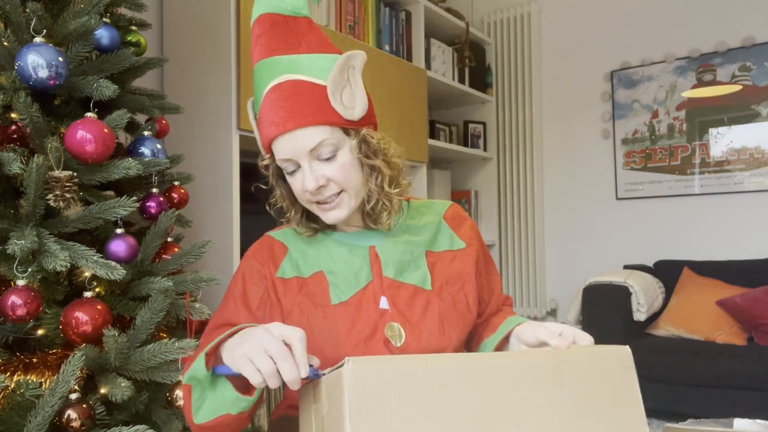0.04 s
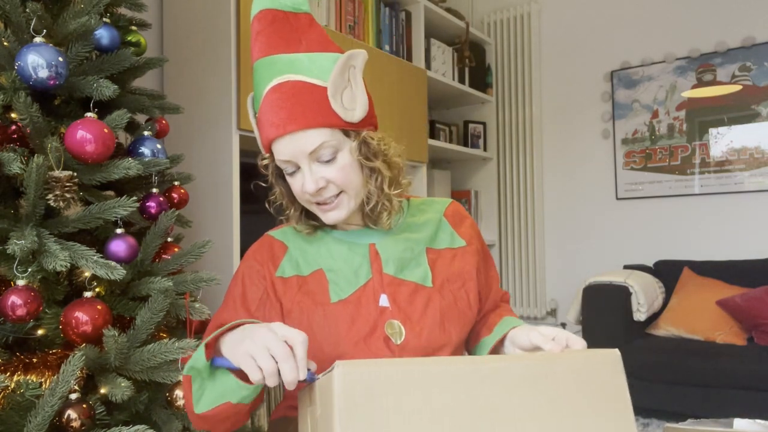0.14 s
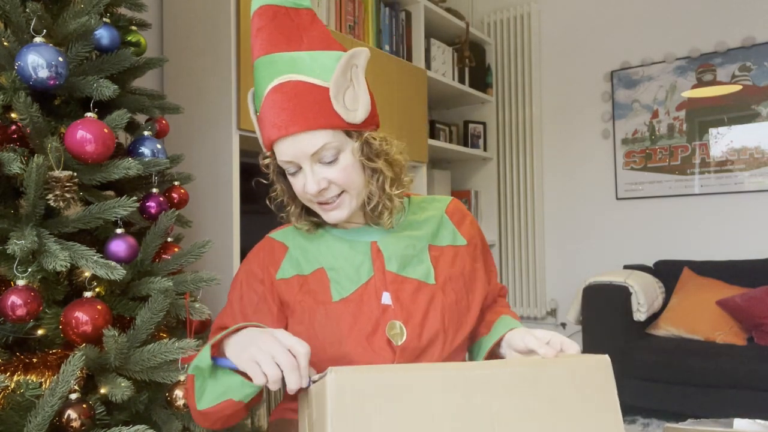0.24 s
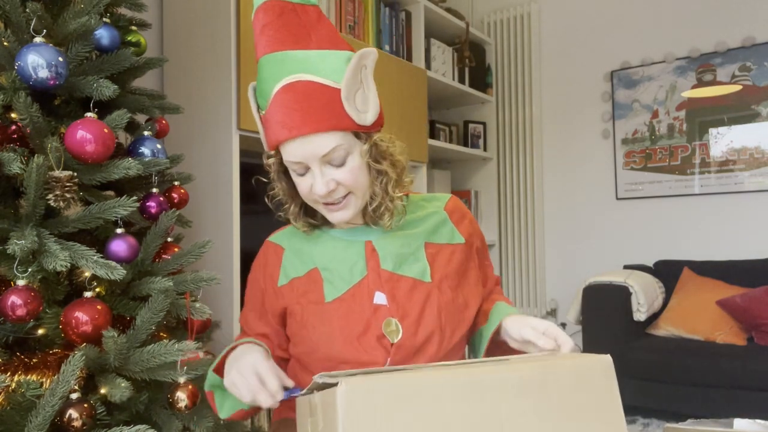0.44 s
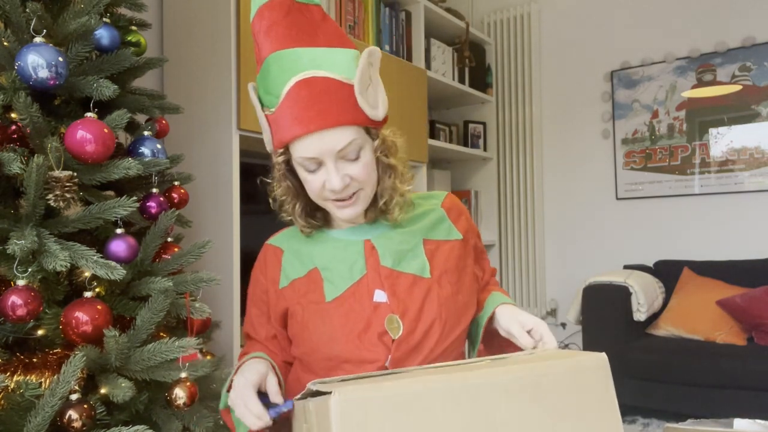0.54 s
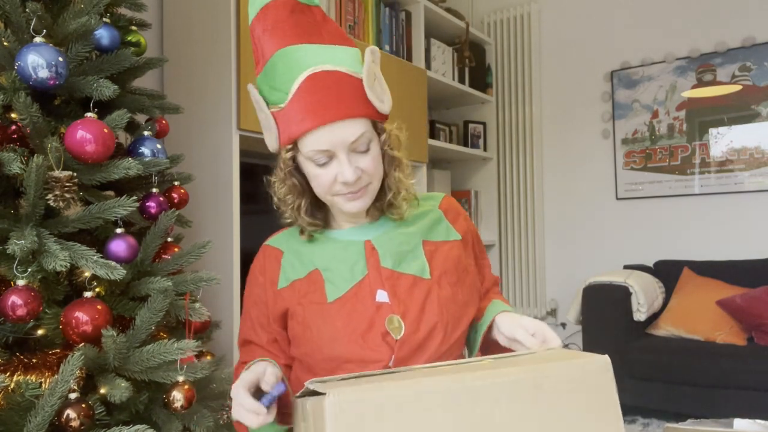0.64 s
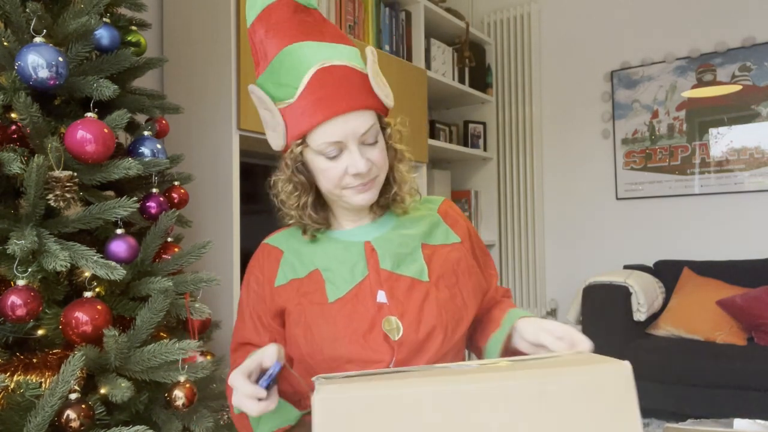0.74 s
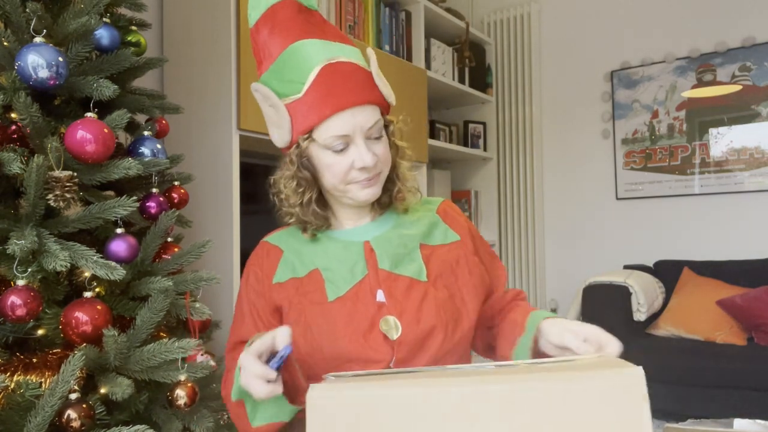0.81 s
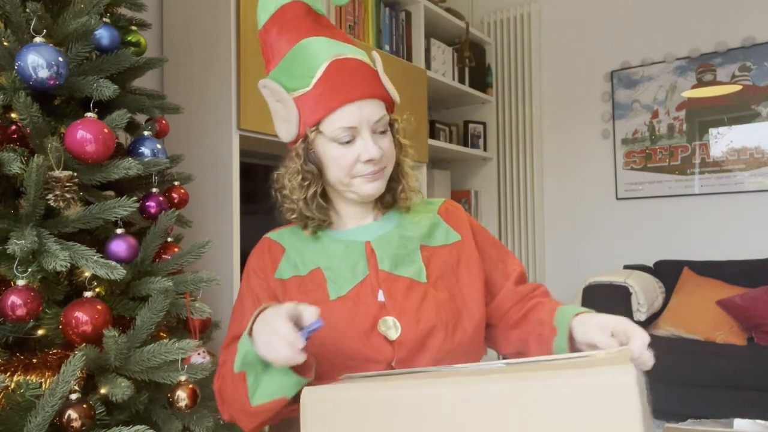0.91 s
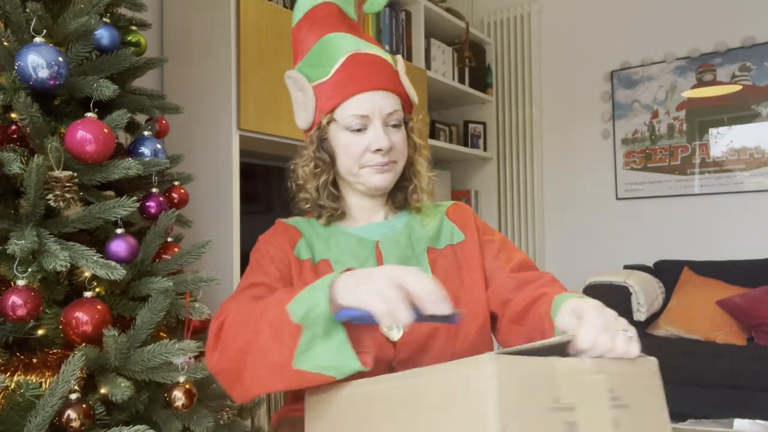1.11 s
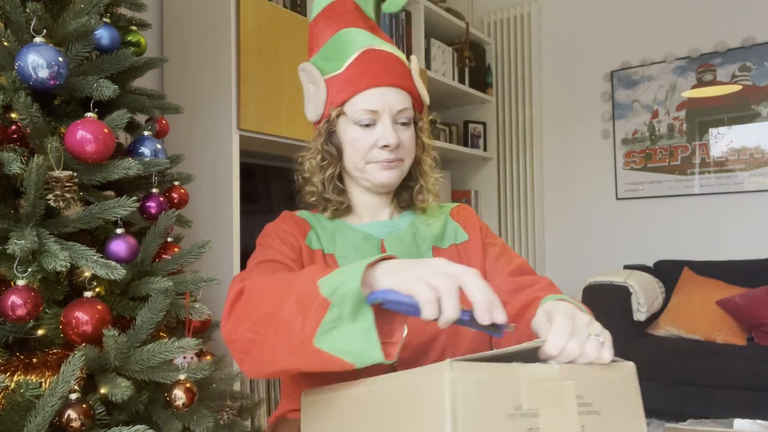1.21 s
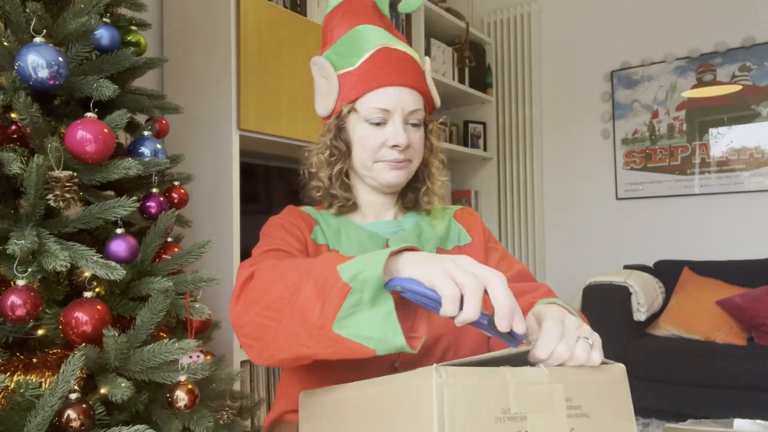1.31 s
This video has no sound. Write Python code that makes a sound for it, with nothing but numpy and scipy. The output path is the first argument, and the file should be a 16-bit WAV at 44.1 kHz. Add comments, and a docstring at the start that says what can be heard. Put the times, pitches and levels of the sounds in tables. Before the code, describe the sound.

A blade rasps through a cardboard box's taped seam, then a flap scrapes free.

```python
"""A knife slits the tape on a cardboard box in a furnished living room, a metre from the microphone.
It opens on a bump; a hand slides over the card, and tape and card tick from here to the end.
From 0.13 s the blade rasps and sets the hollow box droning. Just after 0.3 s it breaks through the
end of the seam with two thumps, then dies away. From 0.6 s the freed flap scrapes past its
neighbour, chirping once as an edge catches."""
import sys
import numpy as np
from scipy import signal
from scipy.fft import rfft, irfft
from scipy.io import wavfile

SR = 44100
rng = np.random.default_rng(int(sys.argv[2]) if len(sys.argv) > 2 else 0)


def digitize_waveform(pressure):
    """Quantize a signal to 16-bit integers and store it at the path in sys.argv[1].

    Rows of a 2-D input are taken as channels; values are limited to [-1, 1].
    """
    field = np.atleast_2d(pressure).T
    bounded = np.clip(field, -1, 1)
    quanta = np.round(bounded * 32767).astype(np.int16)
    wavfile.write(sys.argv[1], SR, quanta)


N = 59535


def from_db(db):
    """Decibels to gain."""
    return 10 ** (np.asarray(db) / 20)


def unit_rms(x):
    """Scale to unit power."""
    return x / np.sqrt(np.mean(x ** 2) + 1e-20)


def fader(rows, column=1):
    """Gain riding a dB curve, silent outside it."""
    rows = np.array(rows)
    return from_db(np.interp(np.arange(N) / SR, rows[:, 0], rows[:, column], left=-150, right=-150))


def eq(x, points):
    """Shape a steady texture with an EQ curve, at unit power."""
    hz, db = np.transpose(points)
    bins_hz = np.maximum(np.arange(N + 1) * SR / (2 * N), 1)
    gain = from_db(np.interp(np.log(bins_hz), np.log(hz), db))
    return unit_rms(irfft(rfft(x, 2 * N) * gain)[:N])


def band(x, hz, spread=1.66):
    """Band-pass from hz / spread to hz * spread."""
    edges = [hz / spread, min(hz * spread, .45 * SR)]
    return signal.sosfilt(signal.butter(2, edges, "band", fs=SR, output="sos"), x + 1e-18)


def low_cut(x, hz):
    """Roll off the lows below hz."""
    return signal.sosfilt(signal.butter(2, hz, "high", fs=SR, output="sos"), x)


def add(out, start_s, x):
    """Mix x in at start_s."""
    i = int(np.clip(start_s * SR, 0, N - 1))
    out[i:i + len(x)] += x[:N - i]


def friction(slips_per_s, scatter_db, rub):
    """Fibres let go at random with uneven strengths, over a smooth rub."""
    strengths = from_db(scatter_db * np.minimum(rng.exponential(1, N), 3.5)) * rng.choice([-1, 1], N)
    grains = strengths * (rng.random(N) < slips_per_s / SR)
    return unit_rms(unit_rms(grains) + rub * rng.standard_normal(N))


def ring(x, modes):
    """A body rings on in decaying modes after whatever shakes it."""
    out = np.zeros(N)
    for hz, db, t60 in modes:
        decay = from_db(-60 / (t60 * SR))
        feedback = decay * np.cos(2 * np.pi * hz / SR)
        out += from_db(db) * signal.lfilter([1, -feedback], [1, -2 * feedback, decay ** 2], x + 1e-18)
    return out


# EQ of the background bed: f/Hz, level/dB
ROOM_TONE_EQ = [(20, -6.5), (45, -18.5), (100, -13.5), (300, -22.5), (1000, -30), (4000, -44), (15000, -48)]

def room_tone():
    """A faint, steady bed of noise, mostly rumble."""
    return from_db(-55) * eq(rng.standard_normal(N), ROOM_TONE_EQ)


def room_reverb(x, t60_s=0.32, predelay_s=0.0044, damping_hz=6030, wet_db=-12.5):
    """A short, slightly dull wash of reflections above the low modes."""
    t = np.arange(SR // 2) / SR
    wash = low_cut(rng.standard_normal(len(t)), hz=574)
    dull = signal.lfilter(*signal.butter(1, damping_hz, fs=SR), wash)
    tail = dull * from_db(-60 * t / t60_s) * (t > predelay_s)
    return from_db(wet_db) * signal.fftconvolve(x, tail / np.linalg.norm(tail))[:N]


# Resonances of the box and the room corner: f/Hz, relative level/dB, t60/s
BOX_MODES = [(160, -7, .22), (215, 0, .3), (269, 1, .34), (361, 0, .33), (432, -9, .2), (515, -6, .28),
             (719, -8, .22), (761, -7, .22), (864, -4, .25), (987, -7, .25), (1119, -7, .22),
             (1237, -7, .25), (1482, 0, .3)]

def box_ring(contacts):
    """The hollow box and the corner of the room ring after each contact."""
    return from_db(-59) * ring(contacts, BOX_MODES)


# Fader ride of the sliding hand: t/s, level/dB
HAND_RIDE = [(0, -43.5), (.05, -44), (.11, -48), (.17, -49.5), (.4, -47), (.6, -56), (.96, -50.5),
             (1.07, -45), (1.145, -44), (1.21, -45), (1.265, -43.5), (1.31, -51), (1.35, -56)]
# Its airy EQ: f/Hz, level/dB
HAND_EQ = [(400, -2.5), (1500, -5), (3000, -2), (4600, 0.5), (6300, 4.5), (9000, -1), (10700, -8.5),
           (15500, -8)]

def hand():
    """Skin hisses over the card."""
    return fader(HAND_RIDE) * eq(friction(slips_per_s=1200, scatter_db=5, rub=1.03), HAND_EQ)


# Fader ride of the freed flap: t/s, level/dB
FLAP_RIDE = [(.60, -62), (.66, -57.5), (.69, -48.5), (.77, -48), (.815, -44), (.865, -39), (.925, -40),
             (.99, -47), (1.06, -65), (1.10, -41), (1.14, -90), (1.23, -76), (1.265, -46), (1.33, -66)]
# Its broad, papery EQ: f/Hz, level/dB
FLAP_EQ = [(60, -16), (200, 4.5), (350, 1.5), (500, -2), (750, 1.5), (1100, 1.5), (2000, 3.5), (3300, -2.5),
           (6000, -5), (9000, -1), (10700, -6), (15500, -8)]

def flap():
    """The flap rubs along its neighbour: a dry, grainy scrape of card on card."""
    return fader(FLAP_RIDE) * eq(friction(slips_per_s=1600, scatter_db=2, rub=0.84), FLAP_EQ)


# Cues for catching card edges: start t/s, length/s, level/dB, start f/Hz, end f/Hz, bandwidth/Hz
CHIRP_CUES = [(0.05, .1, -60, 5000, 5000, 890), (0.143, 0.044, -41.5, 1140, 1430, 1210),
              (.31, 0.087, -42, 4700, 4900, 700), (.948, 0.095, -40.5, 2250, 1660, 650)]

def chirps(attack_share=0.1):
    """A catching edge slips in quick jerks through a gliding resonance."""
    out = np.zeros(N)
    for start_s, length_s, db, start_hz, end_hz, width_hz in CHIRP_CUES:
        n = int(length_s * SR)
        glide = np.exp(2j * np.pi * np.cumsum(np.linspace(start_hz, end_hz, n)) / SR)
        slips = friction(slips_per_s=420, scatter_db=4, rub=0.54)[:n]
        # shift down, low-pass, shift back: a band-pass that follows the glide
        squeak = (glide * signal.lfilter(*signal.butter(2, width_hz / 2, fs=SR), slips / glide)).real
        swell = np.interp(np.linspace(0, 1, n), [0, attack_share, 1], [0, 1, 0])
        add(out, start_s, from_db(db) * unit_rms(squeak) * np.sqrt(swell))
    return out


# Cues for snapping tape and card: t/s, peak level/dB, centre f/Hz
TICK_CUES = [(.0094, -25.5, 1080), (.0099, -22, 9760), (0.016, -19.5, 4630), (.0343, -24, 11600),
             (.0432, -20.5, 6000), (0.123, -31.5, 5300), (0.1286, -30.5, 11500), (.1914, -19.5, 10600),
             (0.1923, -23.5, 1900), (0.199, -22, 4050), (.2196, -4.5, 11400), (0.2194, -14, 2670),
             (0.3808, -20, 10900), (0.415, -32, 7500), (0.4259, -22, 10000), (.4503, -24.5, 3720),
             (0.452, -22, 9000), (0.4674, -22, 6340), (.5142, -29, 594), (0.5233, -26, 5600),
             (.6151, -40, 6900), (0.6697, -27, 1540), (0.6707, -26.5, 3700), (0.6931, -28.5, 5900),
             (.8573, -28.5, 6430), (1.0162, -27.5, 2370), (1.098, -25, 4430), (1.0985, -44, 1000),
             (1.1504, -23.5, 5660), (1.1974, -26, 5600), (1.26, -29, 4020), (1.283, -22, 10100)]

def ticks(crumble_s=0.0034, crumble_db=-20):
    """A sharp snap, then a few milliseconds of crumbling fibres."""
    out = np.zeros(N)
    t = np.arange(SR // 20) / SR
    snap = signal.unit_impulse(len(t))
    for start_s, db, hz in TICK_CUES:
        crumble = from_db(crumble_db) * np.exp(-t / crumble_s) * rng.standard_normal(len(t))
        snap_peak = np.abs(band(snap, hz)).max()
        add(out, start_s, from_db(db) * band(snap + crumble, hz) / snap_peak)
    return out


# Bright resonances of the knife: f/Hz, relative level/dB, t60/s
KNIFE_MODES = [(4860, -7, 0.021), (9150, 1.5, 0.011)]

def knife_ring(snaps):
    """The knife rings briefly with each snap."""
    return from_db(-29.5) * ring(snaps, KNIFE_MODES)


# Cues for blows on the box wall: peak t/s, level/dB, panel f/Hz, length/cycles
KNOCK_CUES = [(0.0127, -20, 180, 0.96), (0.1937, -28, 181, 1.4), (0.223, -28, 242, 0.83),
              (0.2954, -24, 320, 4), (0.3094, -6.5, 335, 3.63), (0.3182, -22, 257, 1.65),
              (0.3239, -15.5, 285, 3.6), (0.3294, -6, 263, 2.2), (0.3389, -22, 333, 4.6),
              (.351, -18, 234, 2.6), (0.3814, -24, 238, 2.5), (0.4278, -26, 315, 4.5),
              (.449, -28.5, 210, 1.7), (0.5164, -20, 382, 3.7), (0.5559, -34.5, 454, 7.9),
              (0.6139, -31.5, 273, 1.6), (0.6677, -37, 190, 4.2), (1.104, -49, 290, 2.8),
              (1.285, -43, 216, 2.8)]

def knocks():
    """Each blow flexes a panel for a few cycles; the two loudest are the breakthrough thumps."""
    out = np.zeros(N)
    for peak_s, db, hz, cycles in KNOCK_CUES:
        half_s = cycles / hz / 2
        t = np.arange(-half_s, half_s, 1 / SR)
        flex = -np.hanning(len(t)) * np.cos(2 * np.pi * hz * t)
        add(out, peak_s - half_s, from_db(db) * flex)
    return out


# Fader ride of the rip: t/s, level/dB
TEAR_RIDE = [(.275, -56), (.309, -48), (.315, -25), (.322, -21.5), (.329, -30.5), (.336, -39), (.42, -45)]
# Its mid-forward EQ: f/Hz, level/dB
TEAR_EQ = [(150, -16), (450, -3.5), (850, 1), (1200, -1), (1500, 0.5), (2400, -6.5), (4000, -11.5),
           (4800, -12), (6500, -14.5), (15000, -36)]

def tear():
    """The last fibres of the seam give way in one short rip."""
    return fader(TEAR_RIDE) * eq(friction(slips_per_s=2300, scatter_db=0, rub=1.0), TEAR_EQ)


# Fader rides of the blade in the seam: t/s, rasp level/dB, drone level/dB
BLADE_RIDE = [(.13, -43.5, -54), (.183, -47, -48), (.193, -32.5, -30.5), (.225, -31, -29.5),
              (.265, -35.5, -29.5), (.31, -29.5, -22.5), (.335, -38.5, -23), (.365, -52, -45),
              (.41, -44, -48), (.448, -39, -41), (.50, -42, -53), (.535, -48, -43), (.58, -66, -53.5),
              (.68, -82, -51), (.74, -77, -76)]
# EQ of the gritty tape rasp: f/Hz, level/dB
RASP_EQ = [(200, 5.5), (600, -7), (1400, -2), (2800, -5.5), (5000, -9), (8000, -9.5), (9100, -3),
           (10200, -14.5), (13300, -11.5), (16000, -16)]
# EQ of the hollow box drone: f/Hz, level/dB
DRONE_EQ = [(35, -53), (70, -13.5), (110, -4), (190, -5), (350, -1.5), (530, -12.5), (850, -13.5),
            (1500, -22), (3000, -36)]

def blade():
    """The edge rasps through the tape and shakes the box wall into a drone."""
    rasp = eq(friction(slips_per_s=4400, scatter_db=7.5, rub=0.99), RASP_EQ)
    drone = eq(friction(slips_per_s=580, scatter_db=3, rub=0.59), DRONE_EQ)
    return fader(BLADE_RIDE) * rasp + fader(BLADE_RIDE, column=2) * drone


def scene():
    """All contacts sound directly, through the box and in the room, over the room tone."""
    bed = room_tone()
    snaps = ticks()
    contacts = blade() + tear() + snaps + knife_ring(snaps) + flap() + hand() + chirps() + knocks()
    contacts = low_cut(contacts, hz=49)  # a low cut, like a microphone's, takes off the deepest rumble
    return (bed + contacts + box_ring(contacts) + room_reverb(contacts))[None]


def record(dry, cutoff_hz=15800):
    """A steep high cut takes off the very top."""
    return signal.sosfilt(signal.ellip(12, .1, 80, cutoff_hz, fs=SR, output="sos"), dry)


dry = scene()
out = record(dry)
digitize_waveform(out)
```